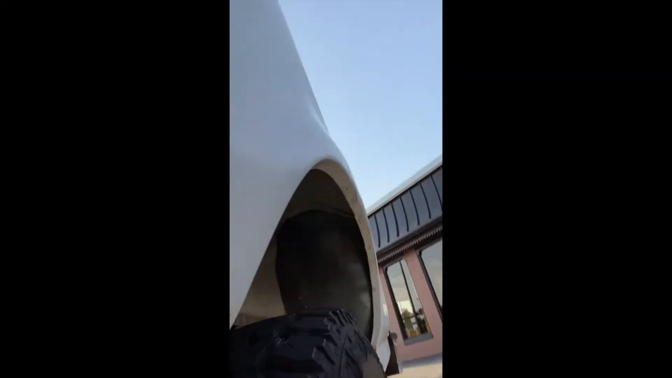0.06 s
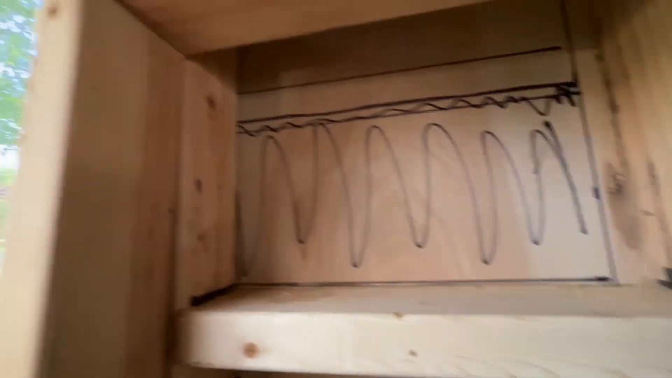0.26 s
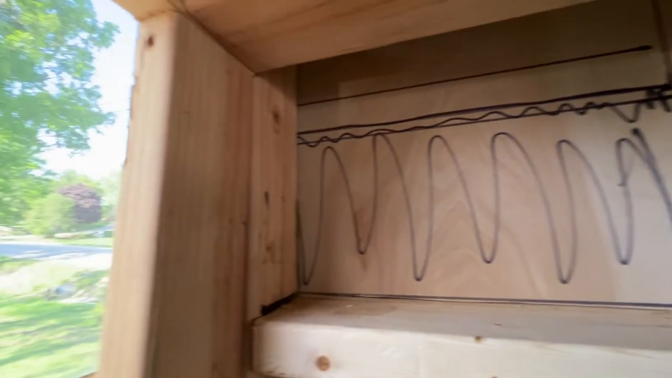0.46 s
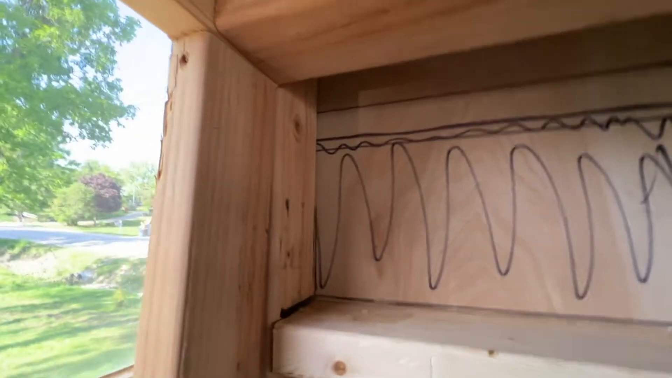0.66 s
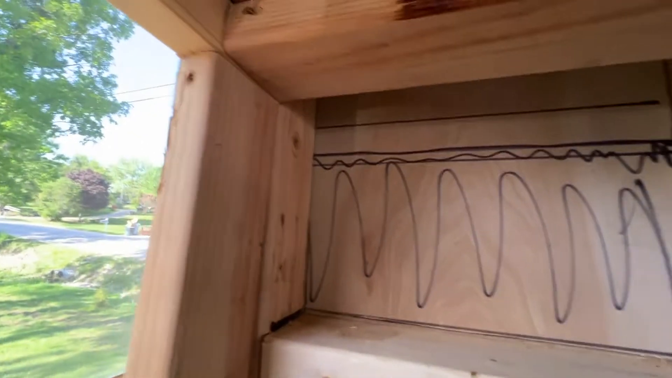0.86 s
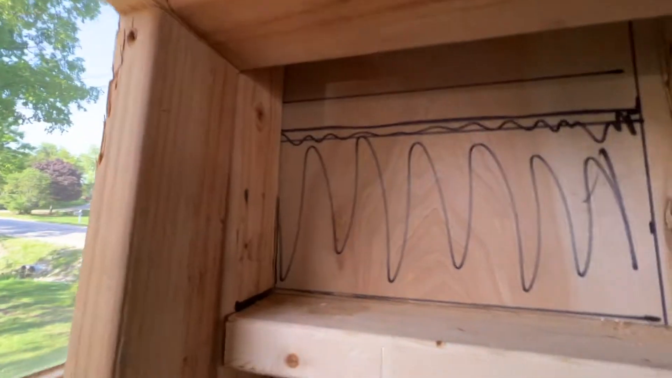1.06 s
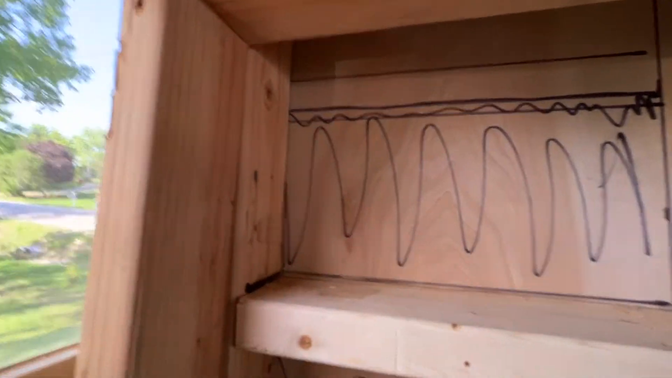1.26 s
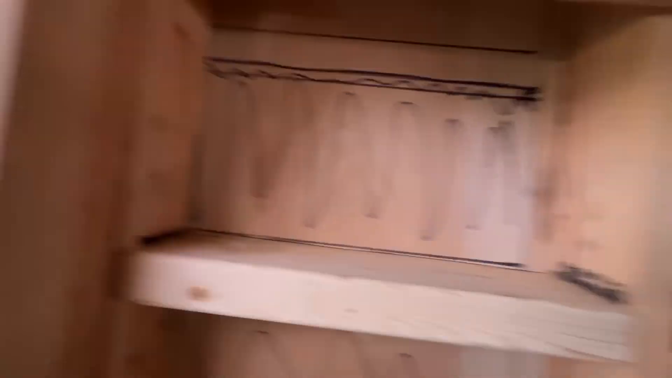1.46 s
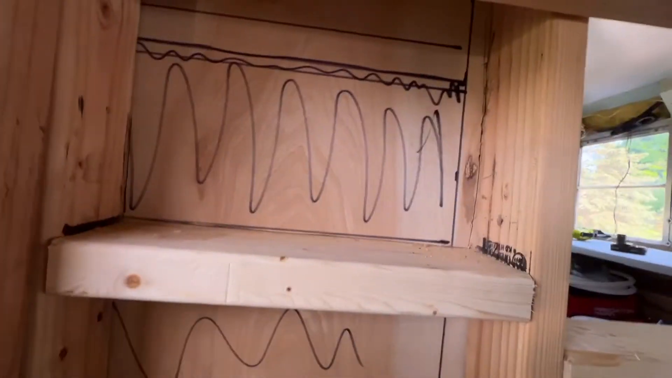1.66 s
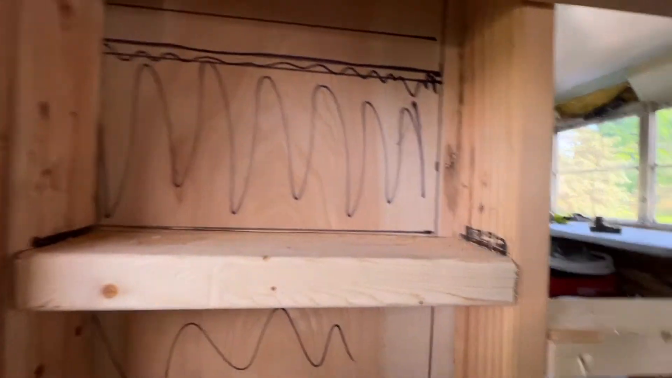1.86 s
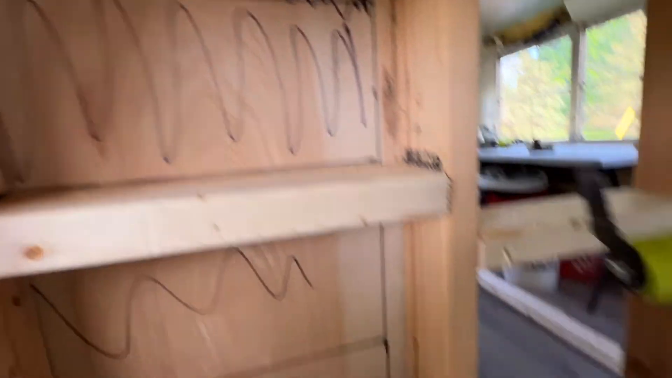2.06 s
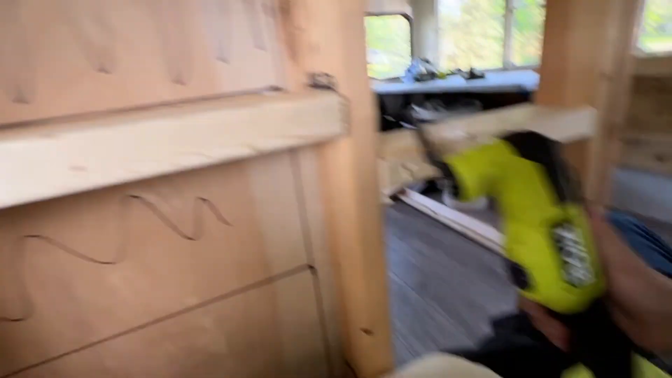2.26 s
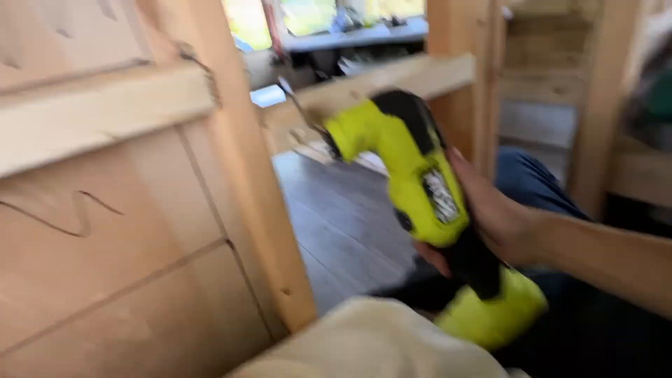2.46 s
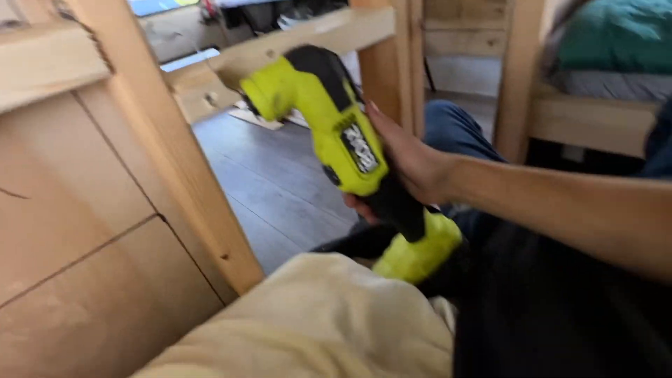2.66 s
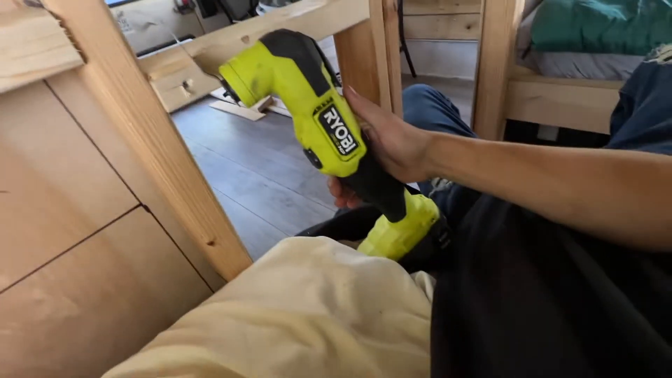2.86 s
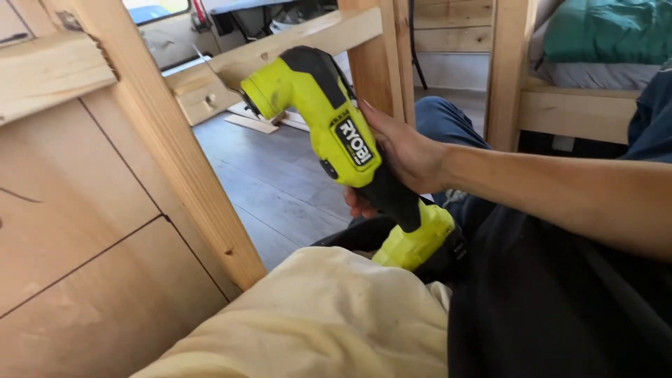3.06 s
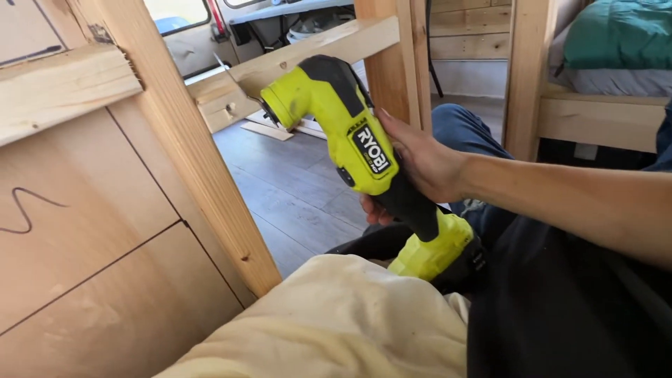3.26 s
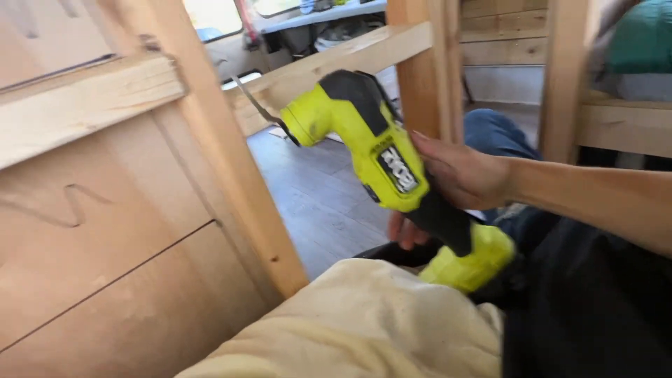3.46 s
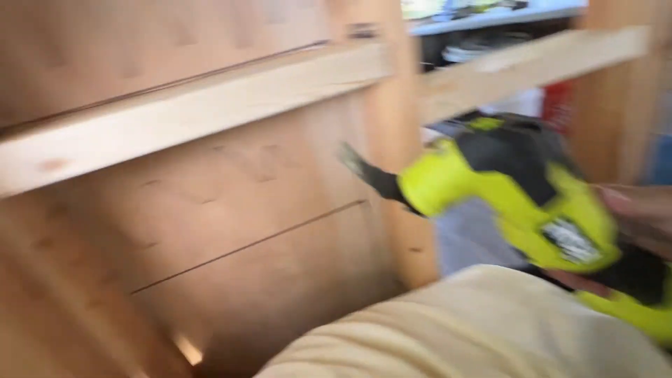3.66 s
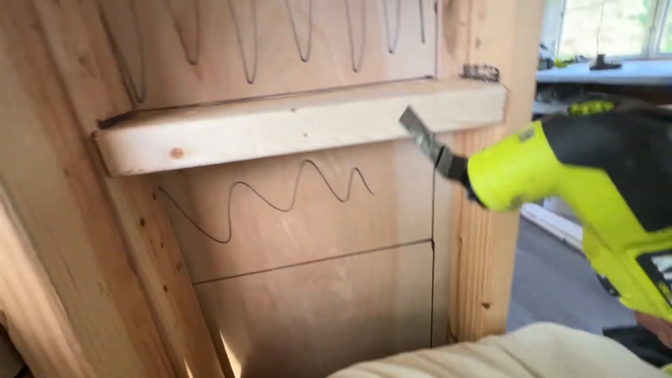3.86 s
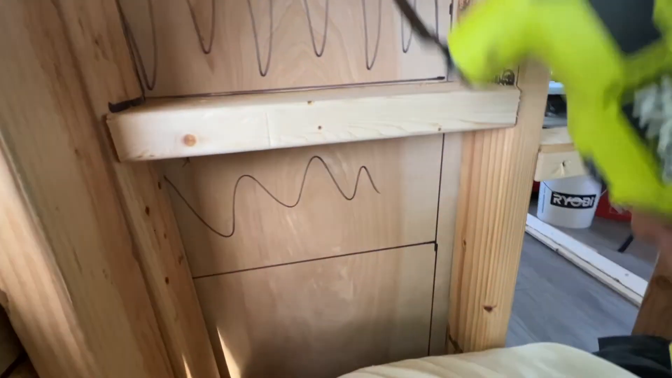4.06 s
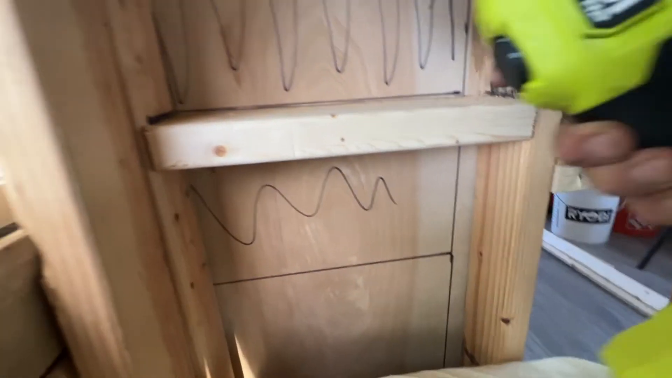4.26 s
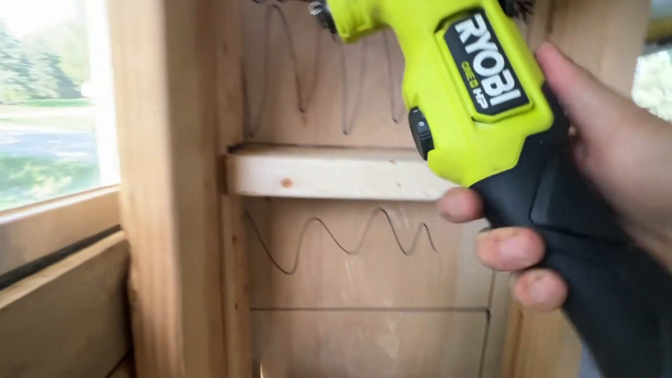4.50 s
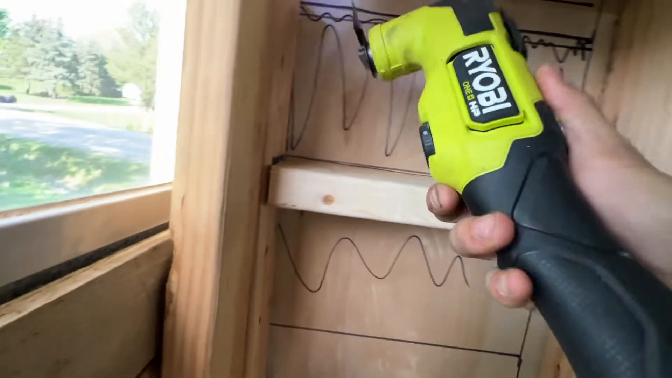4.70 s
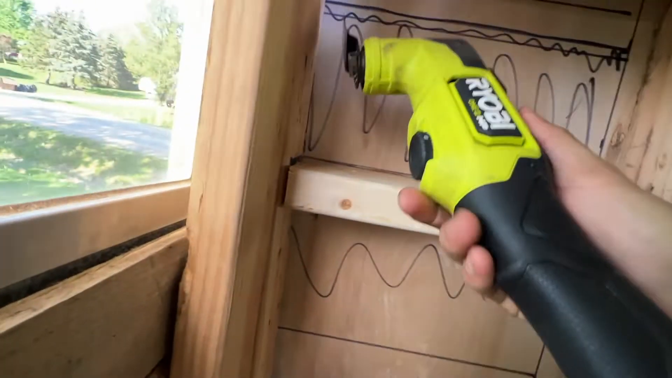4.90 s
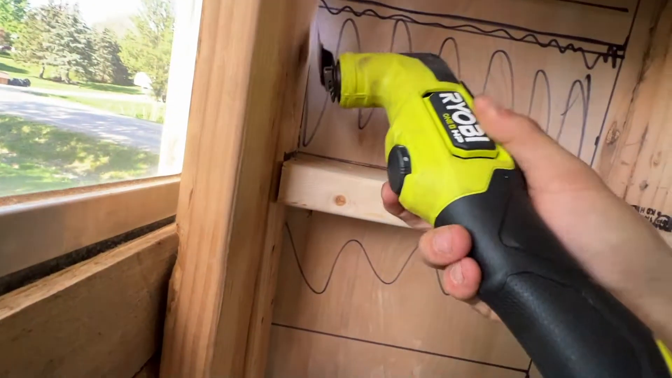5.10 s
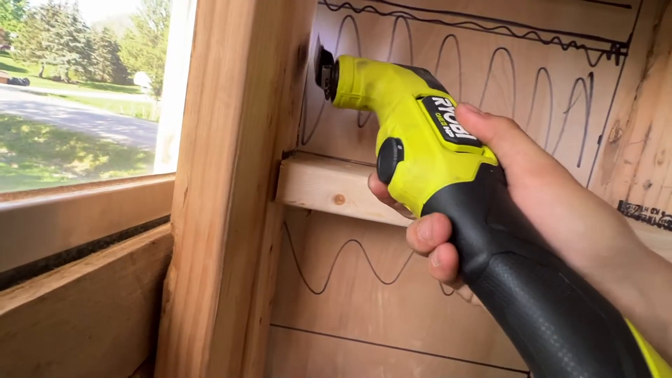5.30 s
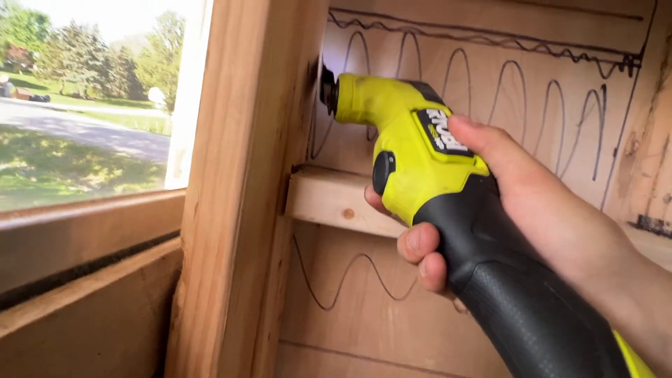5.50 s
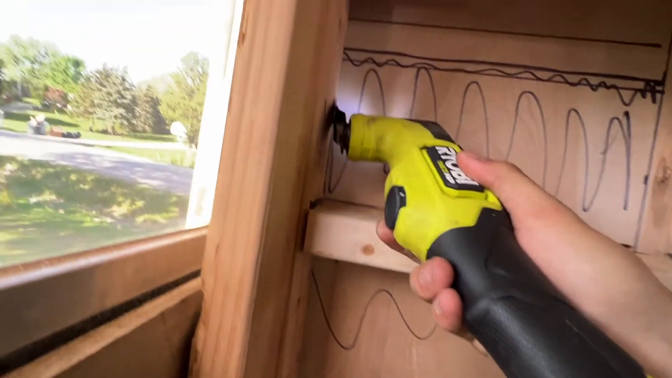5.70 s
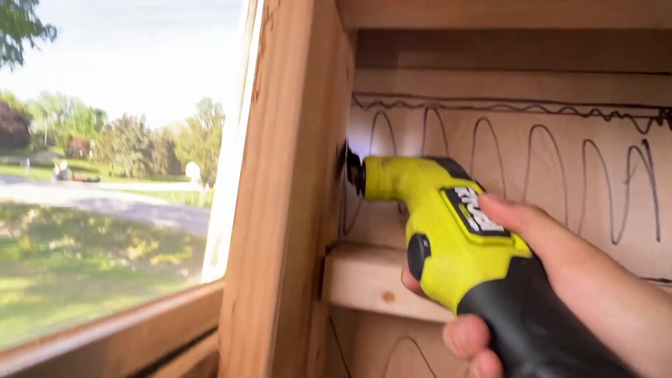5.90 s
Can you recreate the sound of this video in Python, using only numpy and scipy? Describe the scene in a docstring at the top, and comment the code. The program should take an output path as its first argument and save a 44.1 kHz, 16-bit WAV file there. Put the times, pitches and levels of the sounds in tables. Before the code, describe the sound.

Close, handheld stereo sound in a tight, dry timber interior. It opens with brief open-air rumble and whine and a soft thump, then several quiet seconds of fabric rubbing, low handling rumble and scattered woody taps. A sharp switch click starts a small motor, which climbs from loose chatter to a bright even buzz, then falters roughly as its blade bites into plywood.

```python
"""Outdoors for a moment, then a small timber-framed cabin: a sinking whine stops abruptly while the air rumble
dips, swells briefly and fades; then filtered noise rustles as clothes, and decaying noise and sines knock on wood.
The switch of a cordless oscillating tool snaps as damped modes; its motor winds up from a loose rattle of
scattered blows to a hard, even buzz of stroke-rate harmonics passing through resonances.
The blade then bites into plywood: the buzz staggers, the teeth rasp and squeal, and the panel drums."""
import sys
import numpy as np
from scipy import signal
from scipy.fft import rfft, irfft, next_fast_len
from scipy.io import wavfile
from scipy.ndimage import uniform_filter1d

SR = 44100
rng = np.random.default_rng(int(sys.argv[2]) if len(sys.argv) > 2 else 0)


def materialize(psi):
    """Save the field psi as 16-bit PCM at rate SR to the path in sys.argv[1].

    A 1-D psi becomes a single channel; in a 2-D psi each row is a channel.
    """
    bounded = np.clip(np.atleast_2d(psi).T, -1, 1)
    quanta = np.round(bounded * 32767).astype(np.int16)
    wavfile.write(sys.argv[1], SR, quanta)


N = 261954

# Levels in the tables are relative; each function sets the scale of its layers.
# Harmonics of the buzz: (multiple of the stroke rate, left level [dB], right level [dB])
BUZZ_HARMONICS = [(1, -30.5, -20.5), (2, -26, -30), (3, -34.5, -28), (4, -27.5, -22), (5, -18.5, -27.5),
                  (6, -25.5, -26.5), (7, -23.5, -29), (8, -29.5, -50), (9, -72, -44.5), (10, -30, -36),
                  (11, -24.5, -39), (12, -41, -28.5), (13, -29, -34), (14, -51, -61), (15, -33.5, -24),
                  (16, -22, -35), (17, -28, -36.5), (18, -27.5, -34.5), (19, -24.5, -46), (20, -28, -51),
                  (21, -28, -32), (22, -25.5, -41), (23, -36, -42), (24, -25.5, -40), (25, -32, -44),
                  (26, -28.5, -36), (27, -54, -42), (28, -30.5, -32), (29, -40, -40), (30, -32, -50),
                  (31, -47, -52), (32, -35.5, -36)]
# Housing resonances that lift passing harmonics: (frequency [Hz], full width [Hz], lift [dB])
HOUSING_MODES = [(121, 114, 18), (277, 55, 6), (650, 102, 14.5), (946, 85, 9), (1228, 260, 11),
                 (1540, 126, 12), (2070, 450, 6), (2353, 55, 13.5), (3027, 65, 5), (3590, 110, 7.5)]
# Casing resonances rung by the motor's own orders: (frequency [Hz], full width [Hz], lift [dB])
CASING_MODES = [(2652, 140, 7), (3120, 190, 1.9), (3600, 200, 4), (3750, 67, 14.7)]
# The motor's own orders: (multiples of the stroke rate)
MOTOR_ORDERS = (16, 20)
# Critical speed at which the rotor shakes: (stroke rate [Hz], full width [Hz], lift [dB])
CRITICAL_SPEED = [(192.6, 19, 8.5)]
# Harmonics that flare at the critical speed: (multiples of the stroke rate)
FLARING_ORDERS = (5, 6, 16, 20)
# The binding blade squeals on one harmonic: (centre time [s], length [s], multiple, extra level [dB])
SQUEALS = [(5.67, 0.14, 6, 6.5), (5.81, 0.16, 18, 14), (5.915, 0.051, 3, 16.5)]
# Spectrum of the rattle's main body: (frequency [Hz], level per Hz [dB])
CLATTER_SPECTRUM = [(180, -20), (300, -12), (420, -20), (560, -17), (680, -11.5), (800, -10), (1000, -3),
                    (1280, 4), (1550, -2), (1950, -6), (2400, -6.5), (3500, -11), (4600, -30), (7700, -100)]
# Spectrum of the rattle's treble: (frequency [Hz], level per Hz [dB])
SIZZLE_SPECTRUM = [(1500, -49), (2500, -64), (3300, -57), (3900, 11.5), (5200, 7.5), (6400, 6), (8000, -5),
                   (9200, -4), (10500, -22.5), (12500, -20), (15800, -37.5)]
# Growth of each rattle band with speed:
# (top level [dB], drop at rest [dB], knee [Hz], change once seated [dB], change under full load [dB])
CLATTER_GROWTH = (-21, 29.5, 70.5, -9.5, 0.5)
SIZZLE_GROWTH = (-20.5, 28.5, 82, -9.5, 9.5)
# The blade in the wood: (time [s], load [0-1], rasp level [dB], panel level [dB])
CUT_COURSE = [(5.4, 0.01, -120, -120), (5.555, 0.44, -53, -62), (5.585, 0.99, -34, -30),
              (5.64, 0.69, -25, -42), (5.715, .85, -27.5, -40.5), (5.77, 0.78, -22.5, -34),
              (5.83, 1, -23, -34.5), (5.89, 0.84, -53, -42), (5.94, 0.6, -50, -35)]
# Resonances of the blade: (frequency [Hz], half-width at half amplitude [Hz], level [dB])
BLADE_MODES = [(3870, 18, -23), (4470, 21, 14), (5030, 270, 3), (5570, 64, -11), (6180, 21, 16)]
# Spectrum of the drumming plywood: (frequency [Hz], level per Hz [dB])
PANEL_SPECTRUM = [(30, -54), (65, 12.5), (110, -32), (220, 12.5), (420, 3.5), (750, 0.5), (1200, -29),
                  (2500, -31)]
# The switch slides, snaps and bounces: (time [s], level [dB])
SWITCH_CLICKS = [(4.171, -42), (4.1759, -31), (4.179, -10.5), (4.1812, -15), (4.192, -27), (4.1945, -25)]
# Modes of the plastic switch: (frequency [Hz], level [dB], decay by 60 dB [s])
SWITCH_MODES = [(1354, -8, 0.027), (2940, -21, 0.1), (3420, -6, 0.02), (4430, -4, 0.015),
                (5615, -32, 0.063), (6340, -2, 0.011), (6770, -6.5, 0.015), (8940, -1, 0.012)]
# The motor sings as it starts: (time [s], level [dB])
START_LEVEL = [(4.19, -120), (4.197, -60), (4.215, -39), (4.3, -40), (4.38, -35), (4.48, -31.5),
               (4.6, -120)]
# Resonances of the starting motor: (frequency [Hz], half-width at half amplitude [Hz], level [dB])
START_MODES = [(1450, 150, 3.5), (3510, 300, 9)]
# Knocks on the woodwork: (time [s], knock level [dB], thud over knock [dB], tick over knock [dB], ring [Hz])
KNOCKS = [(0.216, -22, -10, -21.5, 869), (0.939, -49.5, 8, -7, 1220), (1.345, -43.5, -10, -5, 2430),
          (1.404, -32.5, -24, -14.5, 815), (1.694, -38, -25, -24, 1720), (2.297, -48, 2, -29, 710),
          (2.636, -47.5, 7.5, -25, 1760), (3.412, -42, -18, -32, 1730), (3.552, -40, 2, -27, 1340),
          (3.603, -40, -23, -17, 2500), (3.631, -39.5, -7, -25, 1350), (3.763, -32, -9, -22, 1380),
          (4.022, -41.5, 0.5, -7.5, 1690), (4.106, -53, -9, 1, 1110)]
# Soft bumps on the camera: (time [s], level [dB], frequency [Hz], decay by 60 dB [s])
BUMPS = [(0.022, -20.5, 125.5, 0.12), (0.034, -21, 68, 0.18), (0.225, -17.5, 187, 0.048),
         (0.939, -32.5, 166, 0.069), (2.693, -31.5, 79, 0.21)]
# Clothes rub with each move of the body and brush the camera:
# (start [s], length [s], rustle level [dB], swish over rustle [dB], dull brush over rustle [dB])
RUBS = [(0.25, 0.18, -64, -0.5, -3), (0.491, .15, -53, 4, -9), (0.73, 0.61, -57.5, 4, -12),
        (1.501, 0.2, -58, 0.5, -13), (1.78, 0.017, -52, 1, -3), (1.87, 0.31, -63, 3.5, 1.5),
        (2.284, 0.14, -58.5, -5, 4.5), (2.458, 0.18, -66, -1.5, 2), (3.405, 0.25, -65, 0.5, 6),
        (3.626, 0.34, -54.5, -7, 1.5), (3.845, 0.08, -55.5, 0, 10.5), (4.046, 0.24, -58, -5, 2)]
# Spectra of the three parts of a rub: (frequency [Hz], level per Hz [dB])
RUSTLE_SPECTRUM = [(150, 4.5), (250, 0), (350, -4.5), (520, -8.5), (800, 1), (1350, 5), (2000, -3.5),
                   (3000, -30), (5000, -34), (9000, -70)]
SWISH_SPECTRUM = [(1200, -7), (2200, -4), (2900, -3), (3700, -6), (4800, -6.5), (7000, -6), (9200, -9),
                  (11000, -30.5), (14000, -42)]
BRUSH_SPECTRUM = [(70, -10), (140, -5.5), (230, -3.5), (400, -21.5), (700, -46.5)]
# Handling rumble of the camera: (time [s], level [dB])
HANDLING_LEVEL = [(0.22, -60), (0.3, -59), (0.66, -57), (0.97, -48), (1.55, -45.5), (2.1, -45.5),
                  (2.55, -48.5), (3.1, -50.5), (3.92, -43.5), (4.18, -48.5)]
# Spectrum of the handling rumble: (frequency [Hz], level per Hz [dB])
RUMBLE_SPECTRUM = [(15, -50), (25, -36), (47, -4.5), (71, 6), (108, -6.5), (139, -7.5), (221, -18.5),
                   (352, -33), (458, -40), (500, -28), (650, -61), (1100, -120)]
# A faint far tone: (time [s], level [dB])
FAR_TONE_LEVEL = [(1.35, -73), (1.6, -64.5), (2.05, -67.5), (2.4, -68), (2.8, -81)]
# The outdoor moment: (time [s], air level [dB], whine level [dB])
OUTDOOR_LEVELS = [(0, -34, -67), (0.03, -26.5, -62), (0.08, -38, -42.5), (0.174, -41, -42),
                  (0.178, -58, -90), (0.2, -41, -83.5), (0.215, -44, -90), (0.25, -87, -90)]
# Spectrum of the open air: (frequency [Hz], level per Hz [dB])
OUTDOOR_SPECTRUM = [(18, -30), (30, 3.5), (146, -6.5), (329, -9.5), (567, -10), (709, -18), (977, -8),
                    (1110, -22.5), (2100, -19), (2380, -28.5), (5240, -34), (6880, -34), (11000, -48),
                    (14300, -74), (22000, -120)]
# Reverberation of the cabin: (frequency [Hz], decay by 60 dB [s])
CABIN_DECAY = [(200, 0.048), (1500, 0.061), (5000, 0.042), (12000, 0.2)]
# Balance of the stereo noises: (frequency [Hz], left minus right [dB])
LEFT_LEAN = [(100, 2.5), (250, 2.5), (700, 0), (1100, 5), (1500, 10.5), (2200, 0.5), (3100, 7), (4400, 9.5),
             (6800, 13), (8200, 6.5), (9400, -0.5)]
# Likeness of the two channels: (frequency [Hz], correlation [0-1])
CHANNEL_LIKENESS = [(70, 1), (140, 0.95), (300, 0.12), (700, 0), (1500, 0.071), (8500, 0), (10000, 0.0011)]

# Free spin-up: start, initial acceleration of the stroke rate, time constant of the drag
SPIN_UP_S, ACCEL_HZ_PER_S, DRAG_S = 4.151, 303.7, 3.98
DRIVE_ON_S = 4.2  # the stroke rate is zero before this
# Governed stroke rate, sharpness of the limit (exponent), drop under full load
FULL_HZ, GOVERNOR_KNEE, SAG_HZ = 284.7, 80, 3.5
# Slack in the drive [0-1]; half of the difference is taken up at TIGHTEN_HZ
SLACK_AT_REST, SLACK_AT_SPEED, TIGHTEN_HZ = 0.9, 0.18, 115.3
LOAD_SLACK = 0.41  # added by a full load on the blade
SEAT_HZ = 237.8  # stroke rate above which the drive begins to seat
# Buzz: level at full speed, growth with speed, change while the drive is unseated
BUZZ_DB, BUZZ_DB_PER_OCTAVE, UNSEATED_DB = -0.5, 13.5, -2
# Change under full load: harmonics of the head, and the less damped orders of the motor
DAMPED_DB, MOTOR_DAMPED_DB = -8, -6.5
RUB_ATTACK_S, RUB_RELEASE_S = 0.028, 0.042
STILL_RUSTLE_DB, STILL_SWISH_DB = -70, -66.5  # between the moves, relative as in the table of rubs
TOP_HZ = 15850  # band limit


def motor(flutter):
    """Governed rotation: drag curves the spin-up, load makes the speed sag and slack makes it flutter."""
    t = np.arange(N) / SR
    load = np.clip(curves(CUT_COURSE)[0], 0, 1)
    free = ACCEL_HZ_PER_S * DRAG_S * (1 - np.exp(-np.maximum(t - SPIN_UP_S, 0) / DRAG_S))
    governed = free / (1 + (free / FULL_HZ) ** GOVERNOR_KNEE) ** (1 / GOVERNOR_KNEE)
    slack_range = SLACK_AT_REST - SLACK_AT_SPEED
    loose = SLACK_AT_SPEED + slack_range / (1 + (free / TIGHTEN_HZ) ** 4) + LOAD_SLACK * load ** 2
    seated = np.clip((free - SEAT_HZ) / (FULL_HZ - SEAT_HZ), 0, 1)
    unsteady = 1 + flutter * np.sqrt(loose) * wobble(90)
    speed = (governed - SAG_HZ * load) * unsteady * (t > DRIVE_ON_S)
    turns = np.cumsum(speed) / SR
    return speed, turns, loose, seated, load


def buzz(state, stagger, stagger_rate, drift_db, tremble, rolloff_db, steadiness, count=54):
    """Harmonic excitation of resonances: lines of the swinging head swell in passing and stagger under load."""
    on = state[0] > 0
    speed, turns, loose, seated, load = (c[on] for c in state)
    t = np.flatnonzero(on) / SR
    level_db = BUZZ_DB + BUZZ_DB_PER_OCTAVE * np.log2(speed / FULL_HZ) + UNSEATED_DB * (1 - seated)
    out = np.zeros((2, N))

    def chance(rate):
        return wobble(rate, len(t))

    for k in range(1, count + 1):
        # beyond the table the last row repeats, progressively weaker
        row = BUZZ_HARMONICS[min(k, len(BUZZ_HARMONICS)) - 1]
        ears_db = np.array(row[1:]) - rolloff_db * np.sqrt(max(k - len(BUZZ_HARMONICS), 0))

        # the first three harmonics reach both channels in step, higher ones do not
        likeness = np.clip(along(CHANNEL_LIKENESS, k * FULL_HZ), -1, 1)
        apart = np.arccos(likeness) * (k > 3) * (-1) ** k

        modes = list(HOUSING_MODES) + list(CASING_MODES) * (k in MOTOR_ORDERS)
        ring_db = lift_db(modes, k * speed) - lift_db(modes, k * FULL_HZ)
        ring_db += lift_db(CRITICAL_SPEED, speed) * (k in FLARING_ORDERS)

        load_db = load * (MOTOR_DAMPED_DB if k in MOTOR_ORDERS else DAMPED_DB)
        for centre, length, multiple, squeal_db in SQUEALS:
            if multiple == k:
                load_db = load_db + squeal_db * np.exp(-(2 * (t - centre) / length) ** 2)

        # slack shakes the lowest line least; tremble grows with order even in a tight drive
        shake = loose * k / (k + steadiness)
        gain_db = level_db + ring_db + load_db + drift_db * shake * chance(14.25)
        depth = stagger * shake + tremble * np.sqrt(k)
        sway = 1 + depth * (chance(stagger_rate) + 1j * chance(stagger_rate))

        line = amp(gain_db) * sway * np.exp(2j * np.pi * (k * turns + rng.random()))
        ears = amp(ears_db) * np.exp([0, 1j * apart])
        out[:, on] += np.sqrt(2) * np.real(ears[:, None] * line)
    return out


def rattle(state, scatter, size_db, grit):
    """Impact across a clearance: the drive fork strikes its bearing and rebounds; slack scatters the blows."""
    speed, turns, loose, seated, load = state
    blows = np.zeros(N)
    # four blows a stroke: (place in the stroke [0-1], signed strength)
    for angle, strength in [(0, 0.52), (0.17, -1.14), (0.47, -0.7), (0.71, 0.28)]:
        at = np.interp(np.arange(1, int(turns[-1])) + angle, turns, np.arange(N))
        slack = loose[at.astype(int)]
        chance = rng.standard_normal((len(at), 2))
        at = np.clip(at + scatter * SR * slack ** 2 * chance[:, 0], 8, N - 10)
        size = strength * amp(size_db * slack * chance[:, 1]) / np.sqrt(speed[at.astype(int)] + 20)
        # a short sinc places each blow between samples
        taps = at.astype(int)[:, None] + np.arange(-7, 9)
        pulses = size[:, None] * np.sinc(taps - at[:, None])
        blows += np.bincount(taps.ravel(), pulses.ravel(), N)

    on = speed > 0
    friction = on * rng.standard_normal(N) * (1 + np.cos(2 * np.pi * turns)) * np.sqrt(loose)
    shaken = cabin(unit(blows) + grit * unit(friction), direct=0.17)
    out = 0
    for spectrum, growth in ((CLATTER_SPECTRUM, CLATTER_GROWTH), (SIZZLE_SPECTRUM, SIZZLE_GROWTH)):
        top_db, rest_db, knee_hz, seated_db, load_db = growth
        band = placed(shaken, shape(spectrum))
        running_rms = np.sqrt(uniform_filter1d(band.mean(0) ** 2, SR // 12) + 1e-2)
        level_db = top_db - rest_db * np.exp(-(speed / knee_hz) ** 2)
        level_db += seated_db * seated + load_db * load ** 2
        out = out + band / running_rms * amp(level_db)
    return out * on


def cutting(state, bite, scrape):
    """Friction excitation: the teeth scrape on both swings and ring the blade, while the plywood panel drums."""
    turns = state[1]
    _, rasp_db, panel_db = curves(CUT_COURSE)
    touching = rasp_db > rasp_db[0]
    contact = np.abs(np.sin(np.pi * turns + np.pi / 4) * np.cos(2 * np.pi * turns)) ** 2
    # the teeth catch about once a stroke, at a slightly uneven place
    catches = np.diff(np.floor(turns + 0.0085 * wobble(150)), prepend=0)
    teeth = unit(catches) + scrape * unit(contact * rng.standard_normal(N))
    teeth_in_room = cabin(teeth * amp(bite * wobble(70)), direct=0.51)
    rasp = placed(teeth_in_room * touching, resonant(BLADE_MODES))
    rasp *= np.sqrt(np.mean(touching))  # rms 1 while the blade touches
    return amp(rasp_db) * rasp + amp(panel_db) * noise(shape(PANEL_SPECTRUM))


def switch(crack, crack_t60, ring_db):
    """Modal impact: the plastic slider snaps and bounces; the motor sings briefly as it takes current."""
    t = np.arange(SR // 8) / SR
    rise = 1 - np.exp(-t / 0.00053)
    clicks = np.zeros((2, N))
    for s, db in SWITCH_CLICKS:
        ring = 0
        for hz, level, t60 in SWITCH_MODES:
            ring = ring + amp(level - 60 * t / t60) * np.sin(2 * np.pi * (hz * t + rng.random((2, 1))))
        snap = crack * amp(-60 * t / crack_t60) * rng.standard_normal((2, len(t)))
        clicks[:, round(s * SR):][:, :len(t)] += amp(db) * (amp(ring_db) * ring + snap) * rise
    tone = shape([(300, -59), (1100, -3.5), (7500, 5.5), (10000, -9), (15000, -21)])
    clicks = filtered(clicks, tone) * amp([[2.5], [-2.5]])  # stronger on the left
    song = amp(curves(START_LEVEL)[0]) * noise(resonant(START_MODES))
    return clicks + song


def knocks(knock_db, thud_db, tick_db, ring_db, t60, ring_t60, tick_t60):
    """Light impact on timber: a dull thud, a woody knock with a short ring, and a tick decay at their own rates."""
    u = np.arange(SR // 4) / SR
    thud, knock, tick, ring = np.zeros((4, N))
    rise = 1 - np.exp(-u / 0.00062)  # soft contacts take a moment to build
    for s, db, low_db, high_db, hz in KNOCKS:
        span = slice(round(s * SR), round(s * SR) + len(u))
        thud[span] += rise ** 3 * amp(db + low_db - 60 * u / (2 * t60))
        knock[span] += rise * amp(db - 60 * u / t60)
        tick[span] += amp(db + high_db - 60 * u / tick_t60)
        ring[span] += rise * amp(db - 60 * u / ring_t60) * np.sin(2 * np.pi * hz * u)
    dull = shape([(50, -18), (170, -0.5), (300, -14), (700, -20), (2000, -62)])
    woody = shape([(300, -63), (800, 11.0), (1400, 2.5), (2400, -1), (5000, -13.5), (10000, -30)])
    bright = shape([(1500, -40), (4000, 11), (9000, 5), (11500, -56)])
    out = amp(thud_db) * thud * noise(dull)
    out += amp(knock_db) * knock * noise(woody)
    out += amp(tick_db) * tick * noise(bright)
    return out + amp(ring_db) * ring * amp([[3], [-3]])


def bumps():
    """Structure-borne sound: soft low thumps pass through the camera's body as damped sines."""
    t = np.arange(SR // 3) / SR
    rise = 1 - np.exp(-t / 0.015)
    out = np.zeros(N)
    for s, db, hz, t60 in BUMPS:
        out[round(s * SR):][:len(t)] += 2 * amp(db - 60 * t / t60) * np.sin(2 * np.pi * hz * t) * rise
    return out


def clothes(grain_db):
    """Frictional noise of cloth: each move adds energy to a rustle, a swish and a dull brush."""
    t = np.arange(N) / SR
    rustle, swish, brush = amp(STILL_RUSTLE_DB), amp(STILL_SWISH_DB), 0
    for s, length, db, swish_db, brush_db in RUBS:
        before = np.maximum(s - t, 0) / RUB_ATTACK_S
        after = np.maximum(t - s - length, 0) / RUB_RELEASE_S
        rub = amp(db) * np.exp(-before ** 2 - after ** 2)
        rustle = np.hypot(rustle, rub)
        swish = np.hypot(swish, rub * amp(swish_db))
        brush = np.hypot(brush, rub * amp(brush_db))
    cloth = rustle * patchy(shape(RUSTLE_SPECTRUM), depth_db=2.5)
    cloth += swish * patchy(shape(SWISH_SPECTRUM), depth_db=2.4)
    cloth += brush * noise(shape(BRUSH_SPECTRUM))
    folds = amp(grain_db * wobble(93))
    return folds * cloth


def surroundings(rumble_db, grain_db):
    """Superposed background: handling rumble and clothes, quieter once the tool runs, and a faint far tone."""
    t = np.arange(N) / SR
    rumble = amp(curves(HANDLING_LEVEL)[0] + rumble_db) * noise(shape(RUMBLE_SPECTRUM))
    settling = amp(curves([(4.16, -1), (5.1, -12.5)])[0])
    tone = amp(curves(FAR_TONE_LEVEL)[0]) * np.sin(2 * np.pi * 1112 * t + 0.6 * wobble(15))
    return settling * (rumble + clothes(grain_db)) + tone


def outdoors():
    """Broadband air rumble dips, swells briefly and fades; a slightly sinking narrowband whine ends abruptly."""
    air_db, whine_db = curves(OUTDOOR_LEVELS)
    turns = np.cumsum(curves([(0.03, 967), (0.18, 951)])[0]) / SR  # (time [s], frequency [Hz])
    whine = np.sin(2 * np.pi * turns + 0.4 * wobble(90))
    whine = whine + 0.26 * noise(resonant([(1780, 70, 5.0), (2120, 100, 0.0)]))
    return amp(air_db) * noise(shape(OUTDOOR_SPECTRUM)) + amp(whine_db) * whine


def cabin(x, direct):
    """Reverberation: close timber walls add a short, dense tail, different in each channel."""
    hz, t, z = signal.stft(rng.standard_normal((2, SR // 6)), SR, nperseg=256)
    decay = amp(-60 * t / along(CABIN_DECAY, hz)[:, None])
    tail = signal.istft(z * decay, SR, nperseg=256)[1]
    tail /= np.linalg.norm(tail[0])
    tail[0, 0] += direct
    tail[1, 18] += direct  # the direct sound reaches the right 18 samples later
    return signal.fftconvolve(x[None], tail, axes=1)[:, :N]


def placed(pair, response):
    """Interaural coherence: unrelated signals mix into coloured stereo with set likeness and lean, mid rms 1."""
    def ears(hz):
        turn = np.arccos(np.clip(along(CHANNEL_LIKENESS, hz), -1, 1)) / 2
        lean = amp(along(LEFT_LEAN, hz) / 2)
        left = [np.cos(turn) * lean, np.sin(turn) * lean]
        right = [np.cos(turn) / lean, -np.sin(turn) / lean]
        return response(hz) * np.array([left, right]) / np.sqrt((lean ** 2 + lean ** -2) / 2)
    return unit(filtered(pair, ears).sum(1))


def noise(response):
    """Filtered random excitation: coloured stereo noise whose mid has rms 1."""
    return placed(rng.standard_normal((2, N)), response)


def patchy(response, depth_db):
    """Non-stationary noise: its level varies in smooth random patches of time and frequency; mid rms 1."""
    z = signal.stft(rng.standard_normal((2, N)), nperseg=512)[2]
    field = uniform_filter1d(rng.standard_normal(z.shape[1:]), size=6, axis=0)
    field = uniform_filter1d(field, size=14, axis=1)
    patched = signal.istft(z * amp(depth_db * field / field.std()), nperseg=512)[1]
    return placed(patched[:, :N], response)


def resonant(modes):
    """Parallel resonance: response of (frequency [Hz], half-width [Hz], level [dB]) peaks."""
    return lambda hz: sum(amp(db) / (1 + ((hz - c) / w) ** 2) for c, w, db in modes)


def lift_db(modes, hz):
    """Resonant gain in dB of a partial near (frequency [Hz], full width [Hz], lift [dB]) modes."""
    return sum(db / (1 + ((hz - c) / w * 2) ** 2) for c, w, db in modes)


def shape(points):
    """Spectral envelope: response of (frequency [Hz], level [dB]) points."""
    return lambda hz: amp(along(points, hz))


def filtered(x, response):
    """Linear filtering: the spectrum of x times a response of frequency."""
    m = next_fast_len(N + 8192)
    return irfft(rfft(x, m) * response(np.fft.rfftfreq(m, 1 / SR)), m)[..., :N]


def wobble(rate, size=N):
    """Slow random modulation: normal random values, rate of them a second, joined by straight lines."""
    at = np.arange(size) * rate / SR
    knots = rng.standard_normal(4096)
    return np.interp(at, np.arange(len(knots)), knots)


def curves(rows):
    """Linear interpolation in time: one value a sample for each column after the time."""
    s, *cols = np.transpose(rows)
    return [np.interp(np.arange(N) / SR, s, c) for c in cols]


def along(points, hz):
    """Logarithmic frequency scale: (frequency [Hz], value) points interpolated along it."""
    f, v = np.transpose(points)
    return np.interp(np.log(hz + 1), np.log(f + 1), v)


def unit(x):
    """Root-mean-square normalisation: the mean of the channels gets rms 1."""
    return x / np.sqrt(np.mean(np.atleast_2d(x).mean(0) ** 2) + 1e-20)


def amp(db):
    """Logarithmic level: decibels to amplitude gain."""
    return 10 ** (np.asarray(db) / 20)


def scene():
    """Superposition of the tool, its switch, the handling sounds and the background."""
    state = motor(flutter=0.0041)
    tool = buzz(state, stagger=0.96, stagger_rate=45, drift_db=8, tremble=0.088,
                rolloff_db=4.0, steadiness=0.5)
    tool += rattle(state, scatter=0.000394, size_db=1.5, grit=0.46)
    tool += cutting(state, bite=4.2, scrape=0.85)
    tool += switch(crack=0.95, crack_t60=0.024, ring_db=0.0)
    handling = knocks(knock_db=-10.5, thud_db=-1.5, tick_db=1.0, ring_db=-4.0,
                      t60=0.055, ring_t60=0.026, tick_t60=0.056)
    handling += bumps()
    return tool + handling + surroundings(rumble_db=2.5, grain_db=0.5) + outdoors()


def record(dry):
    """Saturation and band limiting: the camera rounds high peaks, weakens deep bass and cuts the top."""
    rounded = dry / (1 + np.abs(dry) ** 8) ** (1 / 8)
    bass = shape([(15, -29), (36, -5), (52, -0.5)])
    return filtered(rounded, lambda hz: (hz < TOP_HZ) * bass(hz))


dry = scene()
out = record(dry)
materialize(out)
```